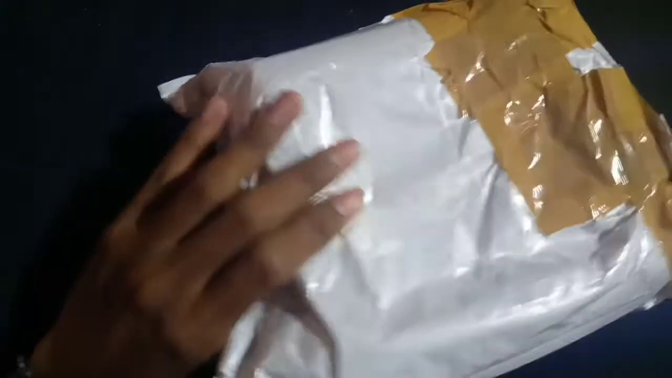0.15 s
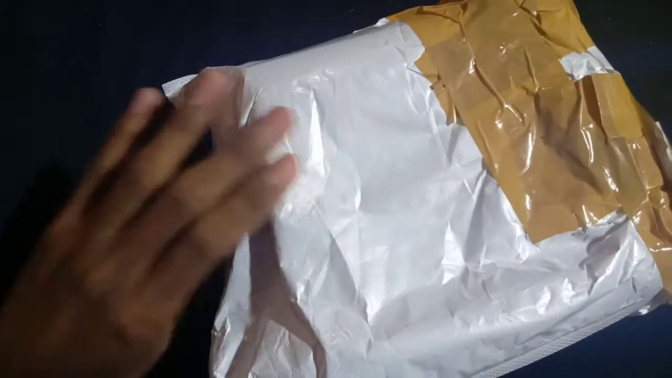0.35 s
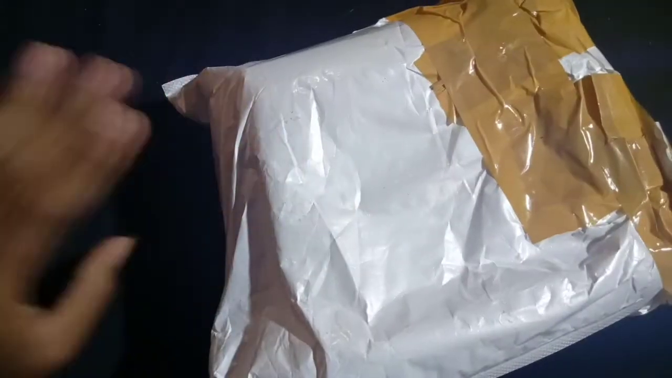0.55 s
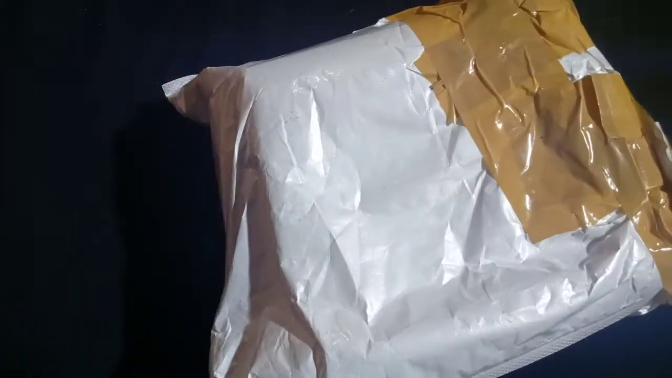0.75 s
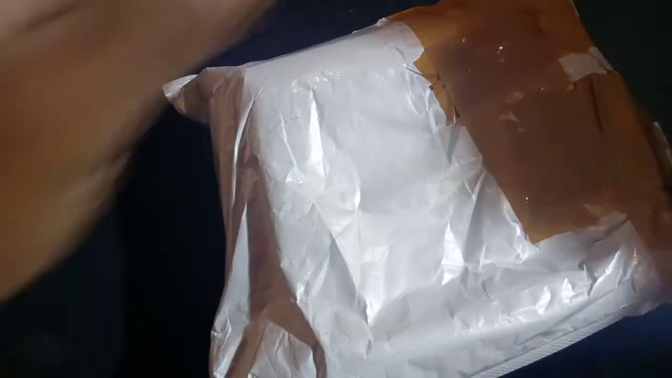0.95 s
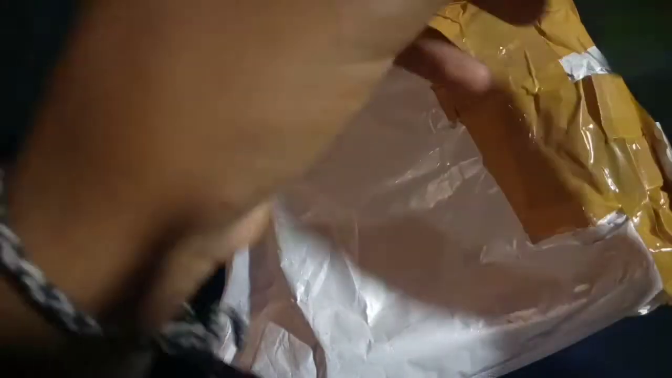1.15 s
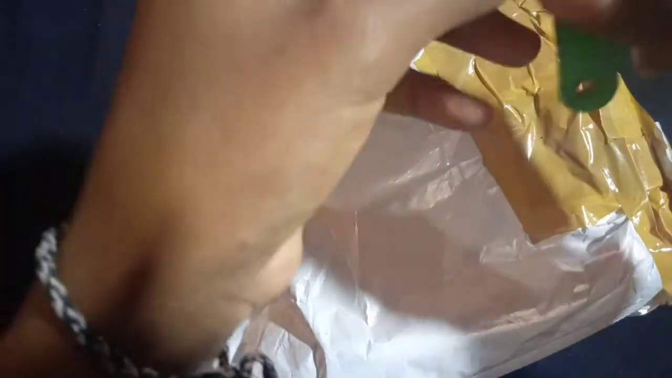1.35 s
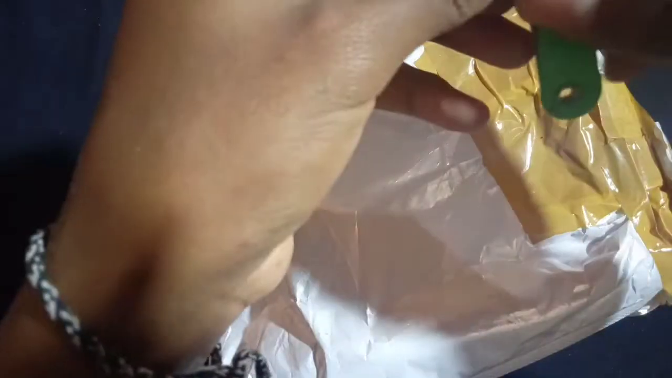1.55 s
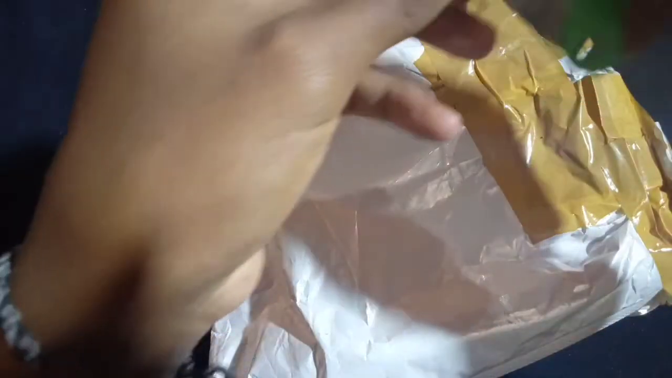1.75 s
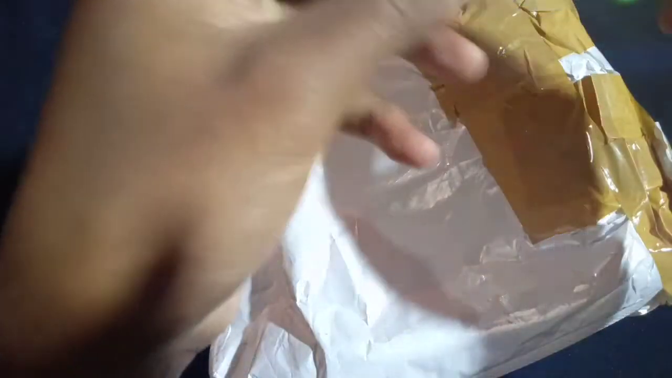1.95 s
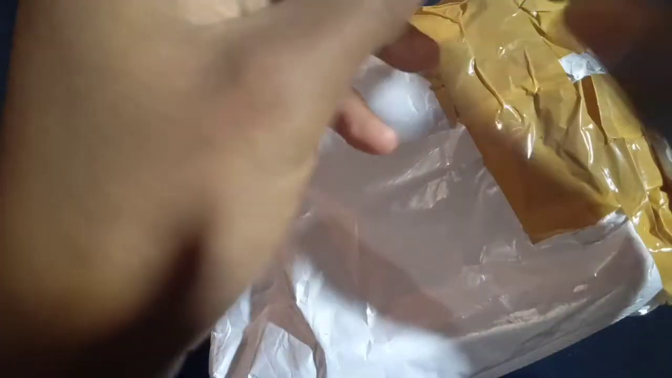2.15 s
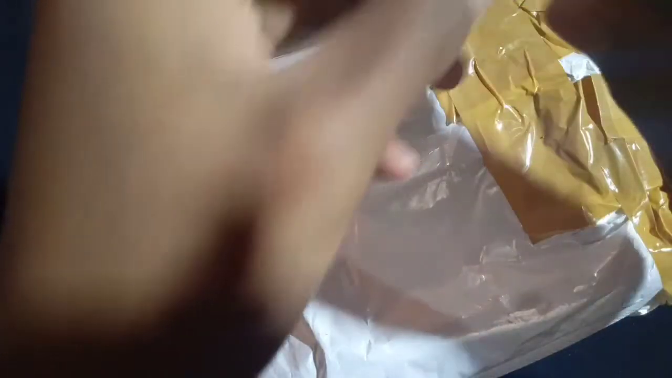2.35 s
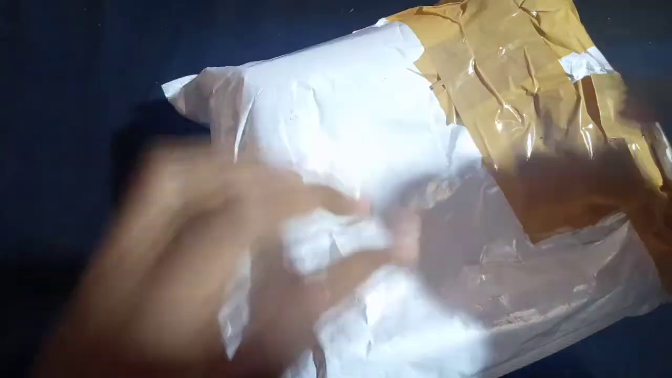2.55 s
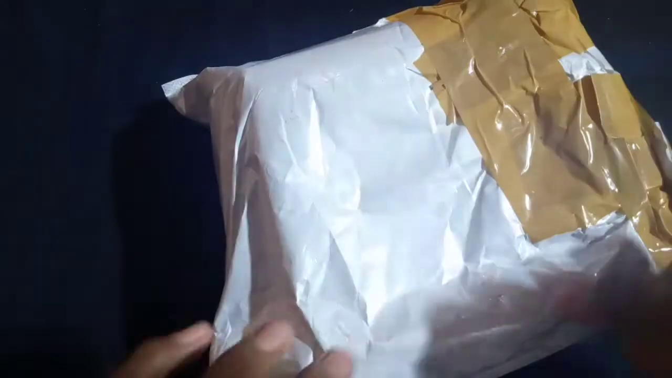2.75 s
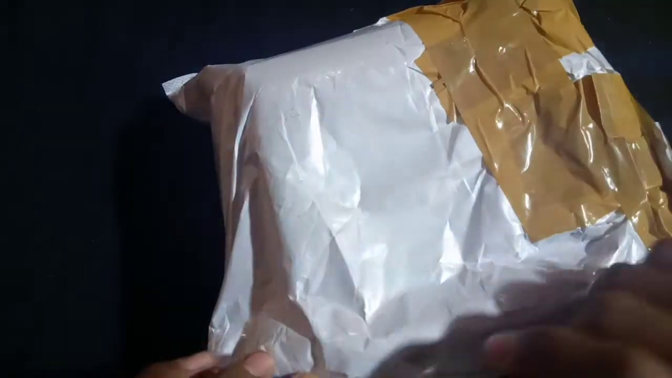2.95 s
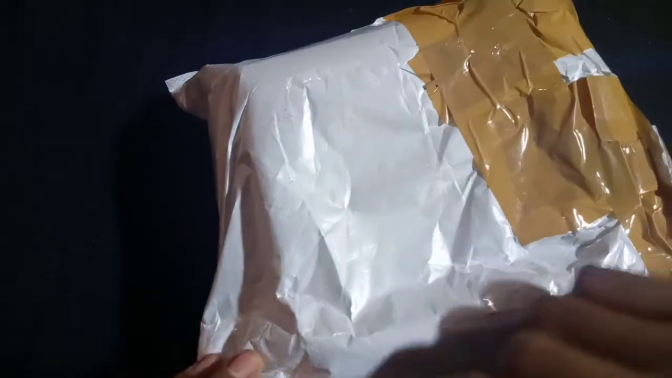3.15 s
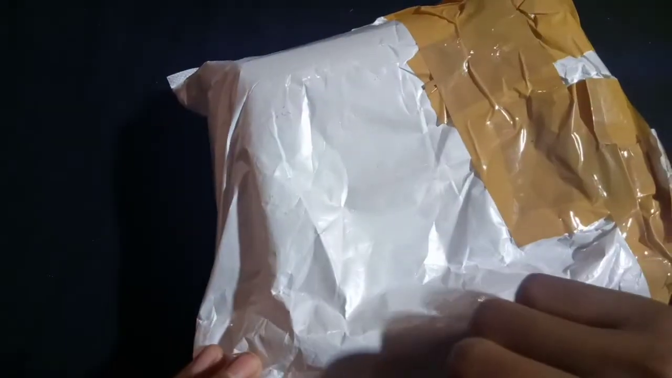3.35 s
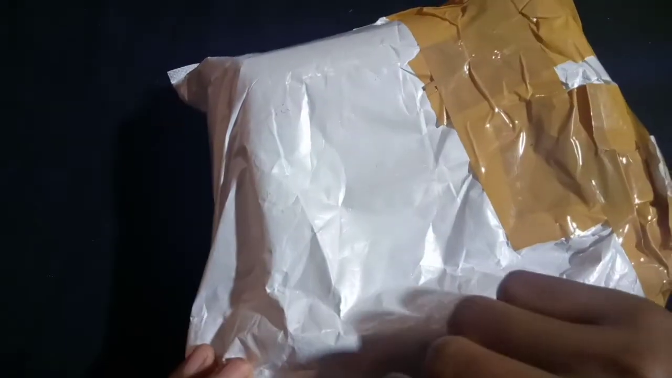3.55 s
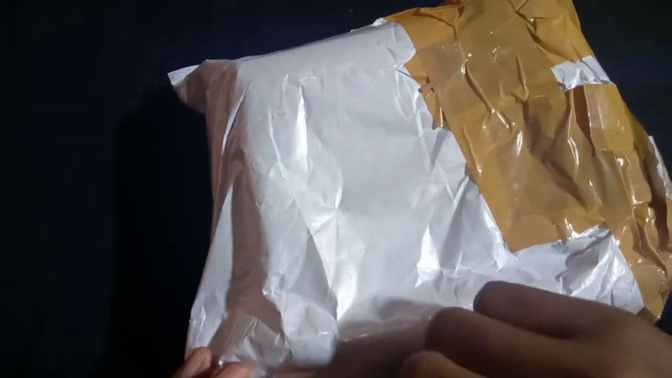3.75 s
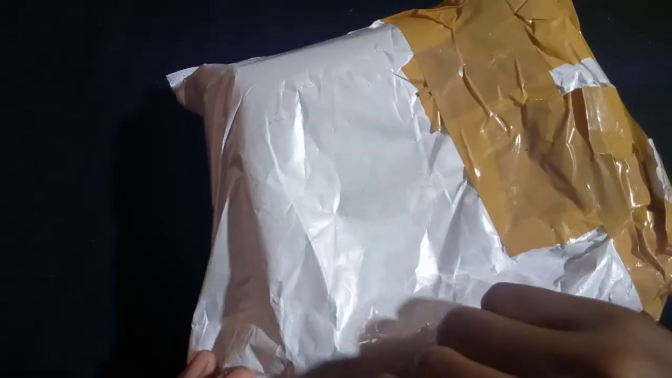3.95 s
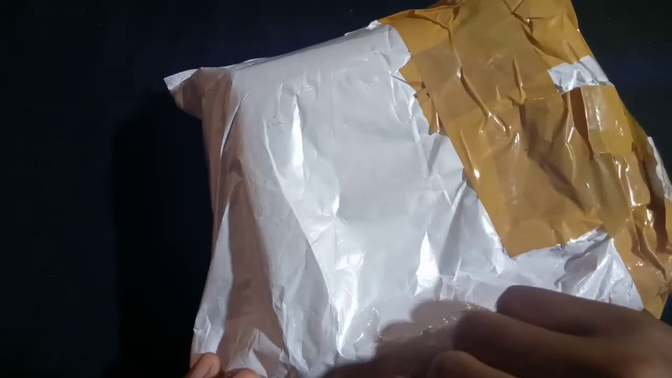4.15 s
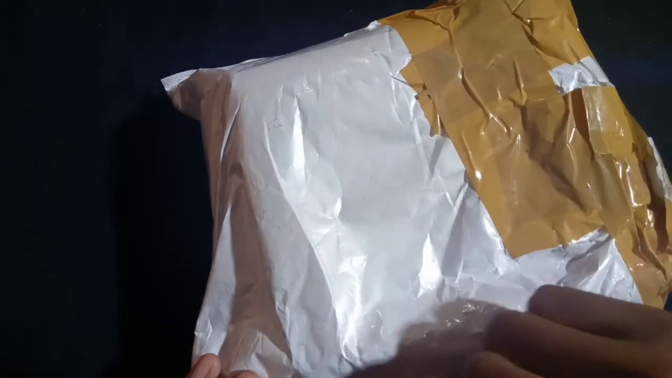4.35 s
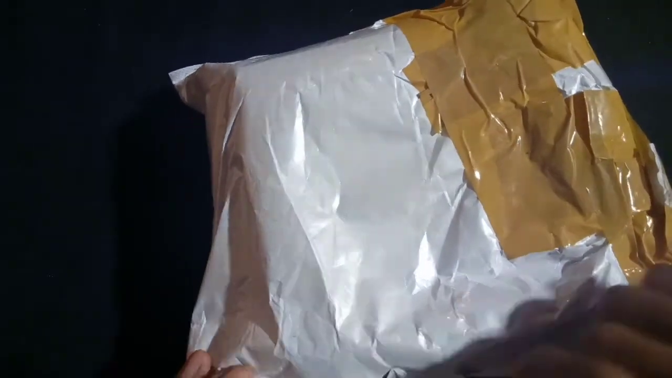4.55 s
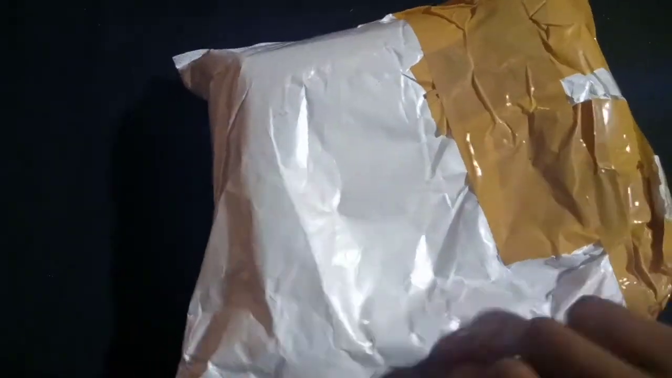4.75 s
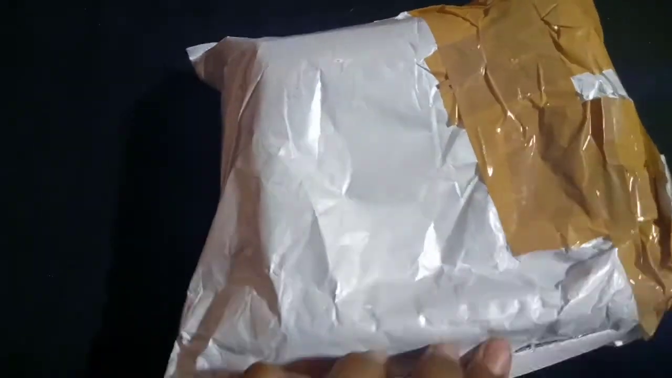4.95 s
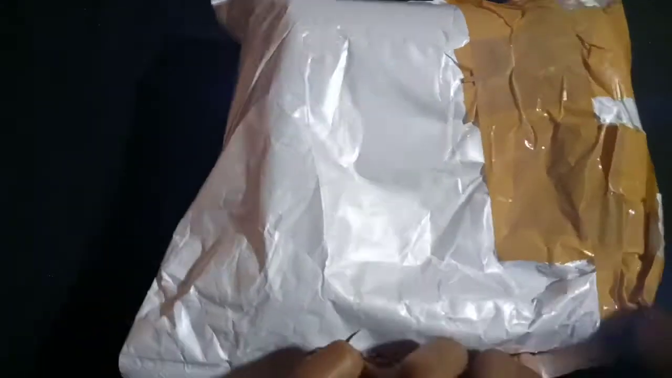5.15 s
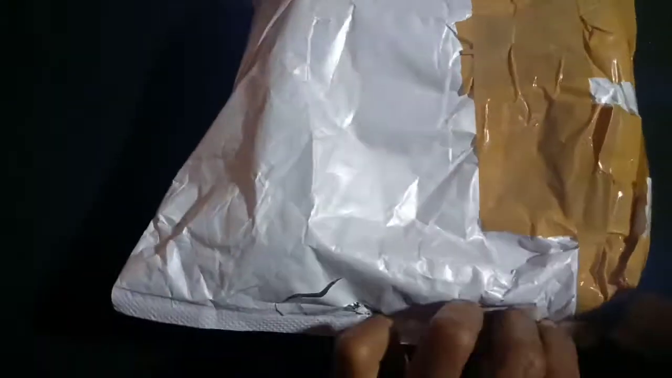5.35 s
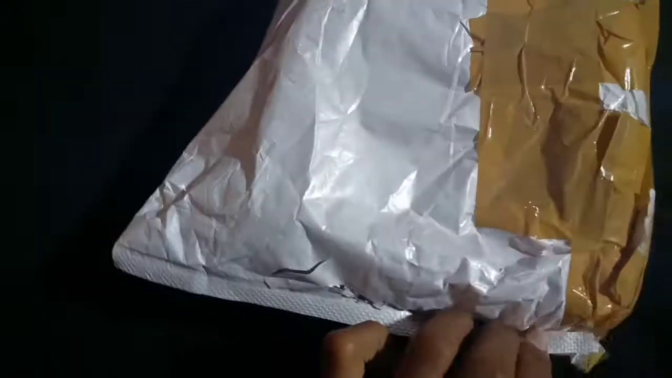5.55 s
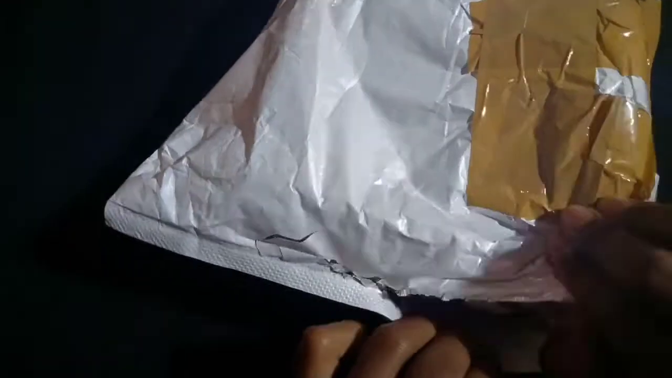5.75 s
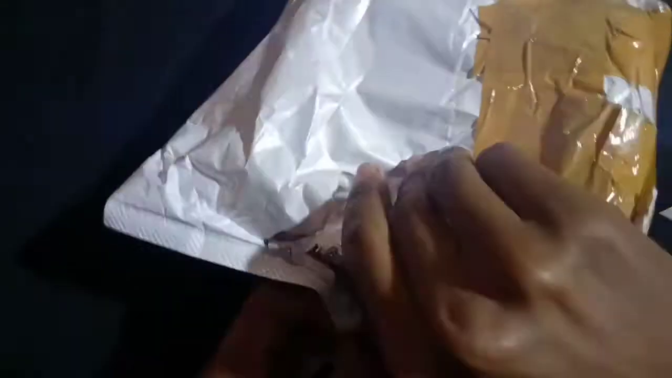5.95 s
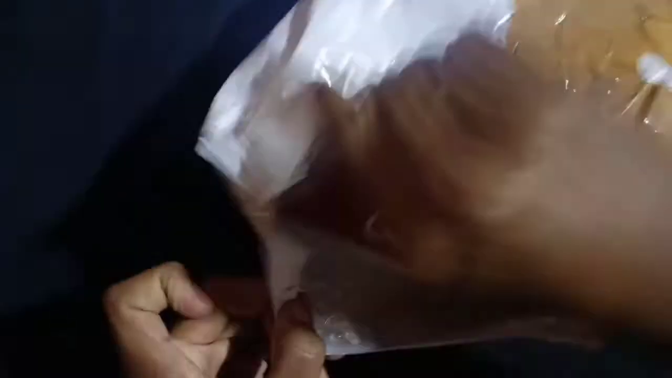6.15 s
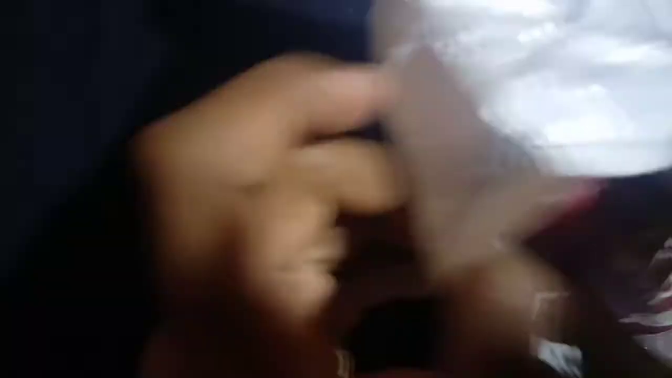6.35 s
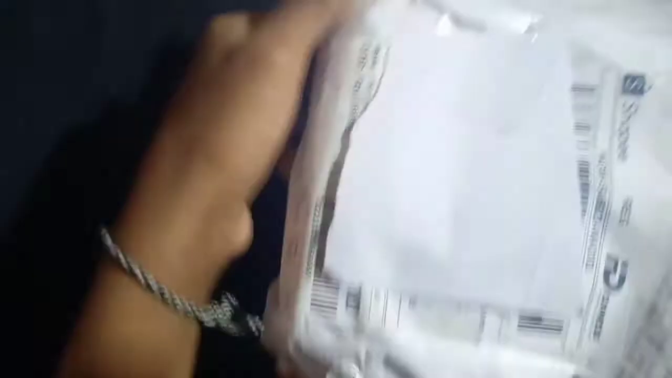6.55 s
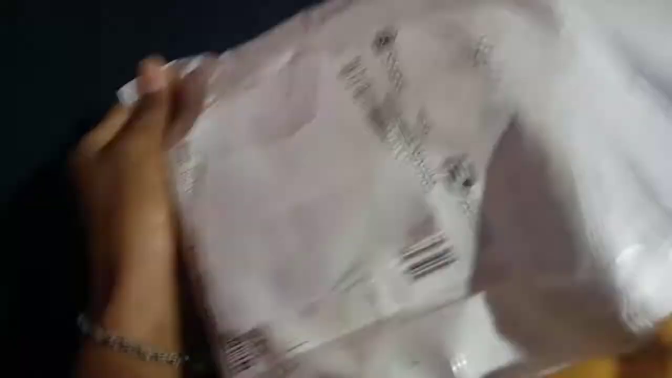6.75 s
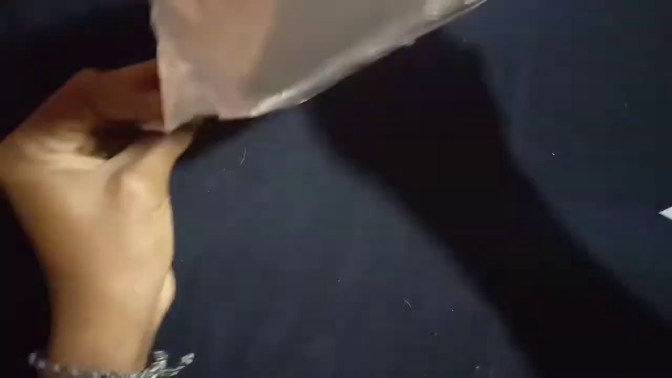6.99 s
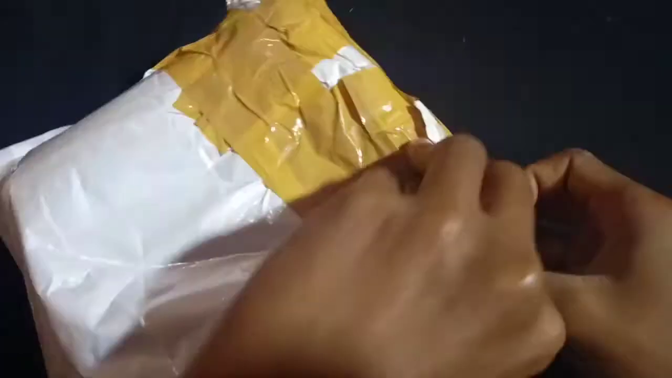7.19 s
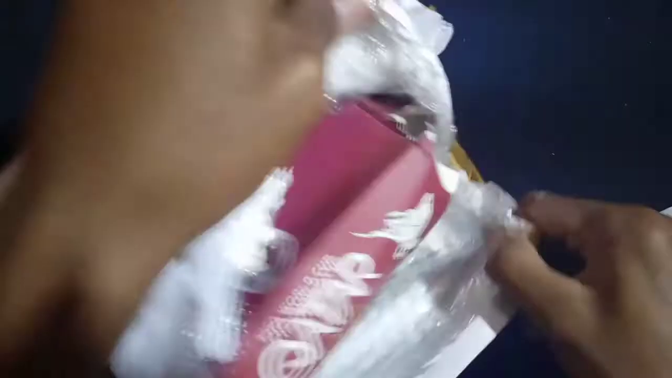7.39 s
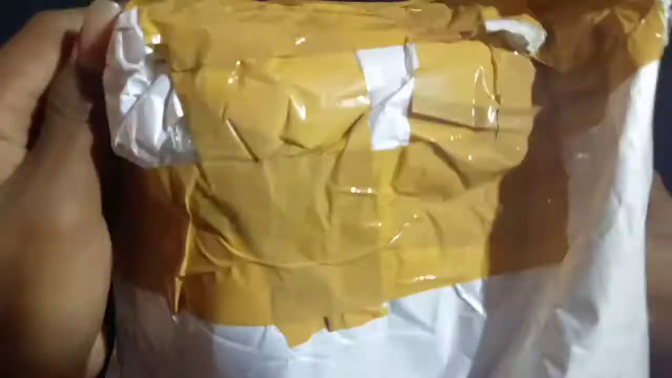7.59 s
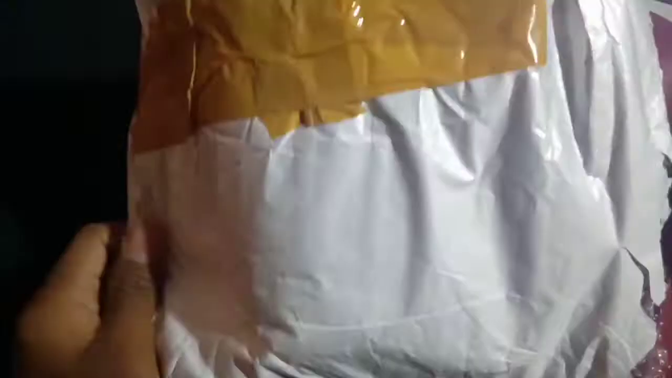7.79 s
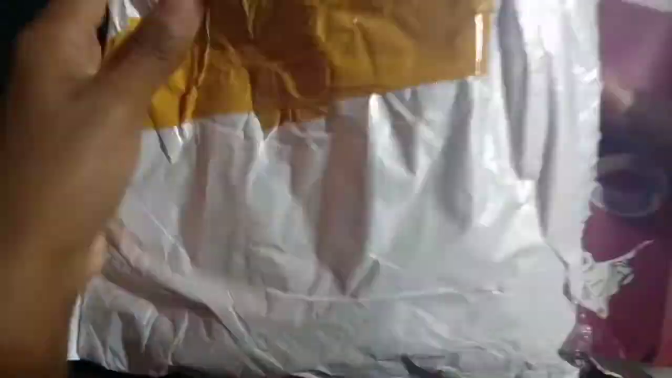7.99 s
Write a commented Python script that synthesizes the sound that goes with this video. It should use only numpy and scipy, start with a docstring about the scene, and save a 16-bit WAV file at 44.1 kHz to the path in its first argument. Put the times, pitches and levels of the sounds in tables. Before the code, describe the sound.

A taped plastic mailer is pressed on a table with hollow knocks and crisp creases, pauses, then is ripped open in bright, dry, dense crackling.

```python
"""A taped plastic mailer is pressed and gripped on a table; a second scene then plays at once, in which it is held up
and ripped open by hand, close to a phone. Its film sounds as single creases, made of short noise pushes that ring a
fold, over a dense crinkle of tiny clicks and sliding hiss. On the table the parcel adds hollow knocks, made of decaying
sines, and a small room answers; held up and torn, the loose film sounds thin, bright and dry. Shaped noise gives
a bump and a scuff, room hiss behind the first scene and a faint rumble behind the second."""
import sys
import numpy as np
from scipy import signal
from scipy.fft import rfft, irfft
from scipy.io import wavfile
from scipy.ndimage import uniform_filter1d

SR = 44100
rng = np.random.default_rng(int(sys.argv[2]) if len(sys.argv) > 2 else 0)


def store_wav(level_fs):
    """Save 16-bit WAV to argv[1]."""
    pcm = np.round(np.clip(np.atleast_2d(level_fs), -1, 1) * 32767)
    wavfile.write(sys.argv[1], SR, pcm.T.astype(np.int16))


N = 353682
TIME = np.arange(N) / SR
GRIP_S, SECOND_SCENE_S = 2.7, 4.51  # the stroking hand starts to grip; the second scene starts (seconds)


def undb(db):
    """Turn decibels into gain."""
    return 10 ** (np.asarray(db) / 20)


def unit(x):
    """Scale to an rms level of 1."""
    return x / np.sqrt(np.mean(x ** 2) + 1e-18)


def add(out, s, x):
    """Mix x into out from time s, in seconds."""
    i = max(int(s * SR), 0)
    out[i:i + len(x)] += x[:max(N - i, 0)]


def band(x, edges_hz, order=3):
    """Keep the frequencies between two edges."""
    sos = signal.butter(order, np.clip(edges_hz, 10, .48 * SR), "band", fs=SR, output="sos")
    return signal.sosfilt(sos, x)


def ring(x, hz, q):
    """One resonance with gain 1 at its centre; a higher q rings longer."""
    centre_hz = min(hz, .4 * SR)
    b, a = signal.iirpeak(centre_hz, max(q, hz / (.4 * SR), .5), fs=SR)
    return signal.lfilter(b, a, x)


def response(points, size=1024):
    """Impulse response with the given (Hz, dB) colour and its energy as early as possible."""
    hz, db = np.transpose(points)
    bins_hz = np.fft.rfftfreq(size, 1 / SR)
    log_gain = np.log(undb(np.interp(np.log(bins_hz + 1), np.log(hz), db)))
    # folding the cepstrum forward in time gives the minimum-phase response
    cepstrum = irfft(log_gain)
    cepstrum[1:size // 2] *= 2
    cepstrum[size // 2 + 1:] = 0
    return irfft(np.exp(rfft(cepstrum)))


def through(x, impulse):
    """Convolve, keeping the length."""
    return signal.oaconvolve(x, impulse)[:len(x)]


def walk(rate):
    """Random wander through about `rate` new values per second, joined by straight lines."""
    count = max(int(N / SR * rate), 2)
    return 0.94 * np.interp(np.arange(N), np.linspace(0, N, count), rng.standard_normal(count))


def level_curve(points):
    """Gain over time from (seconds, dB) points, practically silent outside them."""
    return undb(np.interp(TIME, *np.transpose(points), left=-120, right=-120))


def background():
    """Steady noise: even room hiss behind the first scene, a faint low rumble behind the second."""
    # Colour of the still room. Each row: frequency in Hz, level in dB.
    hiss_colour = [(15, -45), (25, -13), (97, -6), (249, -4.5), (463, -11.5), (531, -11.5), (818, -15.5),
                   (1100, -15), (1290, -17), (2840, -19.5), (4870, -27), (14000, -26), (16000, -30)]
    # Colour of the rumble. Each row: frequency in Hz, level in dB.
    rumble_colour = [(15, 5), (30, -4), (60, -11.5), (120, -17.5), (300, -17.5), (1000, -33)]
    hiss = unit(through(rng.standard_normal(N), response(hiss_colour, size=8192))) * undb(-56.5)
    rumble = unit(through(rng.standard_normal(N), response(rumble_colour, size=8192))) * undb(-60)
    return np.where(TIME < SECOND_SCENE_S, hiss, rumble)


def effort(starts, lengths, levels_db, attack_s, release_s, rest_db):
    """Gain of the rustle: each move of the hand sets in, holds and dies away, over the faint stir of held film."""
    power = np.full(N, undb(rest_db) ** 2)
    for s, length_s, db in zip(starts, lengths, levels_db):
        t = np.arange(int((length_s + 10 * release_s) * SR)) / SR
        rise = np.minimum(t / attack_s, 1)
        fall = np.exp(-np.maximum(t - length_s, 0) / release_s)
        add(power, s, (undb(db) * rise * fall) ** 2)
    return np.sqrt(power)


def film_voices(colour):
    """Split the film's colour into three impulse responses: broad panels, folds and sharp crack."""
    # Ranges of the panels, the folds and the crack. Each row: low edge in Hz, high edge in Hz.
    voice_edges = [(130, 1600), (1600, 6000), (6000, 17000)]
    return [band(response(colour), edges) for edges in voice_edges]


def crinkle(levels, colour, rate, scatter_db, slip_rate, slip_s, slip_db, slide_db,
            facet_q, facet_db, shift_db, flicker_db, count=16):
    """Tiny creases pop on facets of many sizes, over the hiss of film sliding on film.

    levels holds the gains of panel, fold and crack; the rates count pops and slips per second.
    """
    pops = np.zeros(N)
    for facet_hz in np.geomspace(700, 14000, count):
        at = np.flatnonzero(rng.random(N) < rate / count / SR)
        chance = rng.standard_normal(N)[at]
        clicks = np.zeros(N)
        clicks[at] = np.sign(chance) * undb(scatter_db * np.minimum(chance ** 2, 4))
        # the strain wanders from facet to facet, so the colour keeps shifting
        facet_gain = undb(facet_db + shift_db * walk(25))
        pops += clicks + facet_gain * ring(clicks, facet_hz, facet_q)
    # every slip of the fingers sets off a flurry that starts at once and dies away
    slip_starts = 1. * (rng.random(N) < slip_rate / SR)
    flurries = signal.lfilter([1], [1, -np.exp(-1 / (slip_s * SR))], slip_starts)
    slide = undb(slide_db) * rng.standard_normal(N)
    push = (unit(pops) + slide) * np.sqrt(1 + undb(slip_db) ** 2 * flurries)
    # the flurries share out the effort of the hand, which wavers a little
    local_power = uniform_filter1d(push ** 2, size=3000)
    push = push / np.sqrt(local_power + 1e-9) * undb(flicker_db * walk(40))
    return sum(unit(through(push, voice)) * gain for voice, gain in zip(film_voices(colour), levels))


def table_rumble(panel, gain_db, edges_hz):
    """The table top carries the low part of the pressing: low noise that follows the panels' gain."""
    return unit(band(rng.standard_normal(N), edges_hz)) * undb(gain_db) * panel


def pressed_creases(panel_db, panel_db_per_octave, typical_hz):
    """List the pressed creases as rows for snaps(); a low-ringing crease moves more of the panels around it."""
    # Creases snapping on the table. Each row: time in seconds, fold level in dB, fold ring in Hz,
    # crack level in dB relative to the fold.
    creases = [(0.0632, -25, 2900, -4), (0.0907, -17.5, 1940, -18), (0.1039, -27.5, 5300, 0),
               (0.123, -33, 3810, 1), (0.1815, -30.5, 2430, 4), (0.2034, -22, 2120, -25),
               (0.2416, -27, 2210, -24), (0.253, -23, 2580, -30), (1.2586, -54, 3770, -6),
               (1.468, -52.5, 2880, -12), (1.6273, -55, 3380, -4), (1.692, -69, 3270, 22),
               (1.8556, -56, 3870, -5), (2.0322, -58.5, 5730, 16.5), (2.1545, -58.5, 3500, 9),
               (2.2664, -51.5, 5680, 9), (2.286, -46.5, 5740, 10.5), (2.8603, -34, 3510, -12),
               (2.876, -29.5, 3730, -6), (2.9218, -30.5, 4280, -4), (2.9628, -32, 2530, -10),
               (2.9742, -30, 4700, -4), (3.0412, -30.5, 3840, -5), (3.0976, -19, 3840, -14),
               (3.154, -41, 5170, 9), (3.1742, -30.5, 4900, -4), (3.3777, -32.5, 5600, -0.5),
               (3.448, -33.5, 5700, 8), (3.3968, -47, 5160, 10), (3.475, -35, 4600, 0),
               (3.5149, -42, 4540, 8.5), (3.6404, -39, 1940, -11), (3.6538, -36.5, 4600, 7),
               (3.6797, -35.5, 3830, 2.5), (3.7469, -32.5, 2600, -1), (3.7742, -25, 3600, -4),
               (3.7975, -18.5, 2220, -7.5), (3.8357, -30, 2730, -11), (3.8589, -23, 4270, 0),
               (3.8769, -17.5, 4570, -1.5), (3.9162, -31.5, 4480, 3), (3.9363, -22, 3360, 9.5),
               (4.1698, -46, 4670, 9), (4.2032, -36.5, 4500, 0.5), (4.345, -22.5, 2940, 9.5),
               (4.3622, -28.5, 3420, -5), (4.377, -29.5, 4120, -7), (4.3987, -38, 4280, 12),
               (4.4529, -44, 4400, 18), (4.4934, -34.5, 4320, 3)]
    rows = []
    for s, db, hz, crack_db in creases:
        rows.append((s, db, hz, panel_db - panel_db_per_octave * np.log2(hz / typical_hz), crack_db))
    return rows


def small_snaps(gain, start_s, end_s, over_db, scatter_db, fold_hz, octaves, panel_db, crack_db, count):
    """List lesser creases at random times as rows for snaps(), with levels that follow the rustle's gain."""
    when, size, tune, broad, sharp = rng.uniform(-1, 1, size=(count, 5)).T
    s = start_s + (when + 1) / 2 * (end_s - start_s)
    # one crease sets off its neighbour a moment later, typically 14 ms
    s[1::2] = s[::2] + .014 * (1 + when[1::2] / 2)
    db = 20 * np.log10(np.interp(s, TIME, gain) + 1e-9) + over_db + scatter_db * size
    hz = fold_hz * 2 ** (octaves * tune)
    return list(zip(s, db, hz, panel_db + scatter_db * broad, crack_db + scatter_db * sharp))


def dulled(colour, top_db):
    """A big crease is darker at the very top than the fine rustle."""
    return [(hz, db + top_db * (hz > 11500)) for hz, db in colour]


def snaps(rows, colour, buckle_s, swell, creak_s, creak_db, shiver_s, shiver_db, fold_q, spread_db, bounce):
    """A crease creaks under strain, buckles in about a millisecond, rings its fold and leaves the sheet shivering.

    Each row: time in seconds, fold level in dB, fold ring in Hz, then panel and crack in dB relative to the fold.
    """
    lead_s, measure_s = .008, .004  # room for the creak; stretch of sound that sets the level
    out, t, voices = np.zeros(N), np.arange(2048) / SR - lead_s, film_voices(colour)
    first = (t > -measure_s / 4) & (t < 3 * measure_s / 4)
    after, age = t >= 0, np.abs(t)
    typical_db = np.median(np.array(rows)[:, 1])
    for s, db, hz, panel_db, crack_db in rows:
        jolt, shiver, grain = rng.standard_normal((3, len(t)))
        path = rng.random()
        # a louder snap runs further along the crease
        run_s = buckle_s * undb(swell * (db - typical_db))
        buckle = jolt * np.exp(-age / run_s)
        shivering = undb(shiver_db) * shiver * np.abs(grain) * np.exp(-age / shiver_s)
        push = after * (buckle + shivering)
        # the far wall of the bag throws it back, by another path for each crease
        push = push - bounce * np.roll(push, int((.0003 + .0009 * path) * SR))
        creak = ~after * undb(creak_db) * shiver * np.exp(-age / creak_s)
        panel = through(push, voices[0])
        fold = through(push + creak, voices[1])
        crack = through(push, voices[2])
        fold = ring(fold, hz, fold_q) + undb(spread_db) * fold
        for part, part_db in ((panel, panel_db), (fold, 0), (crack, crack_db)):
            add(out, s - lead_s, part * undb(db + part_db) / np.sqrt(np.mean(part[first] ** 2)))
    return out


def knocks():
    """The hand knocks the filled parcel: its modes ring in a new mix, and a softer contact leaves only the low ones."""
    # Knocks of the hand. Each row: time in seconds, level in dB, contact cut-off in Hz.
    hits = [(0.09, -14.5, 2200), (.152, -22, 397), (0.178, -24.5, 1110), (.207, -25, 504),
            (0.2416, -22.5, 1300), (.2545, -21.5, 586), (0.263, -25.5, 2200), (0.278, -31, 900),
            (0.449, -66, 900), (1.535, -54, 600), (2.9619, -25, 610), (3.146, -26, 565),
            (3.798, -31.5, 1800), (4.345, -32.5, 700)]
    # Modes of the parcel before random variation. Each row: frequency in Hz, relative level in dB,
    # time to fall by 60 dB in seconds.
    parcel_modes = [(301.5, -10.5, 0.045), (387, -2.5, 0.031), (462, -11.5, 0.031), (534, 0.5, 0.037),
                    (630, 4.5, 0.0094), (880, -2.5, 0.035), (1120, -5, 0.037), (1364, -9.5, 0.051),
                    (1894, -3, 0.018)]
    out, t = np.zeros(N), np.arange(6000) / SR
    hz, db, t60 = np.transpose(parcel_modes)[:, :, None]
    measure_s = .015  # opening stretch that sets the level
    for s, level_db, contact_hz in hits:
        detune, place = rng.standard_normal((2, len(parcel_modes), 1))
        tones = np.sin(2 * np.pi * hz * (1 + 0.036 * detune) * t)
        modes = undb(db + 3.1 * place) * tones * np.exp(-np.log(1000) * t / t60)
        flip = rng.choice([-1, 1], (len(parcel_modes), 1))
        contact = signal.butter(2, contact_hz, fs=SR, output="sos")
        knock = signal.sosfilt(contact, (flip * modes).sum(axis=0))
        # so small a parcel radiates little bass
        knock = band(knock, [230, 5000], order=2)
        add(out, s, knock * undb(level_db) / np.sqrt(np.mean(knock[:int(measure_s * SR)] ** 2)))
    return out


def room(x, t60_s, low_db, high_db):
    """Diffuse answer of a small room: a noise tail that builds up over a few milliseconds, then dies away."""
    t = np.arange(SR // 2) / SR
    tail = rng.standard_normal(len(t)) * np.exp(-np.log(1000) * t / t60_s) * (1 - np.exp(-t / 0.0019))
    colour = response([(500, low_db), (3000, high_db), (12000, high_db + 0.5)])
    return through(x, through(tail / np.linalg.norm(tail), colour))


def bump():
    """A dull, brief swell of low noise as the arm moves over the table."""
    # Course of the swell. Each row: time in seconds, level in dB.
    swell_points = [(.69, -80), (.735, -50), (.755, -55), (.812, -44), (.83, -46.5), (.852, -47),
                    (.89, -62), (.96, -83)]
    return unit(band(rng.standard_normal(N), [72, 150], order=2)) * level_curve(swell_points)


def on_table():
    """First scene: knocks, snaps and crinkle of the lying parcel, answered by the room."""
    # The fingers press, slide and grip. Each row: start in seconds, length in seconds, fold level in dB,
    # then panel and crack in dB relative to the fold.
    presses = [(0, 0.0057, -37, 3.5, 0.5), (0.043, .15, -35, -1.5, -2), (0.246, 0.051, -41.5, 7.5, -3),
               (0.423, 0.088, -66.5, -1, 7.5), (0.803, 0.073, -63.5, 2, 0.5), (1.295, 0.044, -70, 2, 11),
               (1.58, 0.063, -77, -4, 17.5), (2.24, 0.094, -66, -3, 4), (2.838, 0.071, -45, 0, 4.5),
               (2.923, 0.083, -38.5, -3.5, 0.5), (3.038, 0.19, -43, -2, 2), (3.324, 0.15, -52.5, -0.5, 2.5),
               (3.438, 0.063, -48.5, -2.5, 3), (3.636, 0.097, -48.5, 0, 0), (3.753, 0.12, -38, -2.5, -2.5),
               (3.931, 0.019, -38.5, 1, 5.5), (4.113, 0.14, -50.5, 0.5, 6), (4.331, 0.033, -39, -2.5, -2),
               (4.439, 0.027, -42.5, -1, 4.5)]
    # Colour of the film under a flat, stroking hand. Each row: frequency in Hz, level in dB.
    stroked = [(60, -50), (120, -16), (280, -2.5), (500, 0.5), (760, -4), (1200, -10), (2050, -9.5),
               (2900, -8.5), (4200, -12), (6800, -14), (11500, -12.5), (16000, -27)]
    # Colour of the film lying on the table. Each row: frequency in Hz, level in dB.
    lying = [(60, -43), (120, -20), (280, -5), (500, -.5), (760, -4.5), (1200, -10), (2050, -8),
             (2900, -12), (4200, -9.5), (6800, -15), (8000, -6.5), (9100, -14.5), (10300, -7), (12000, -14),
             (16000, -23)]
    s, length, db, panel_db, crack_db = np.transpose(presses)
    panel, fold, crack = (
        effort(s, length, db + part_db, attack_s=0.014, release_s=0.048, rest_db=-74) * (TIME < SECOND_SCENE_S)
        for part_db in (panel_db, 0, crack_db))
    rows = pressed_creases(panel_db=-10.0, panel_db_per_octave=3.5, typical_hz=3770)
    rows += small_snaps(fold, 0, SECOND_SCENE_S, over_db=-3.5, scatter_db=4.5, fold_hz=4230, octaves=0.44,
                        panel_db=-9, crack_db=4.5, count=36)
    snapping = snaps(rows, dulled(lying, top_db=-5.5), buckle_s=0.00034, swell=0.038,
                     creak_s=0.00063, creak_db=-26, shiver_s=0.0023, shiver_db=-19.5,
                     fold_q=3.9, spread_db=-15, bounce=0.37)
    levels = np.array([panel, fold, crack])
    # a flat hand strokes the film before the fingers grip its edge
    stroking = crinkle(levels * (TIME < GRIP_S), stroked, rate=1400, scatter_db=3,
                       slip_rate=77, slip_s=0.0032, slip_db=5, slide_db=-5.5,
                       facet_q=9.7, facet_db=-7, shift_db=11, flicker_db=1.2)
    pressing = crinkle(levels * (TIME >= GRIP_S), lying, rate=1500, scatter_db=4,
                       slip_rate=85, slip_s=0.0024, slip_db=7.5, slide_db=-1.5,
                       facet_q=9.7, facet_db=-7, shift_db=13, flicker_db=1.15)
    direct = knocks() + snapping + stroking + pressing
    answer = room(direct, t60_s=0.27, low_db=-9.5, high_db=-11.5)
    return direct + answer + table_rumble(panel, gain_db=-9, edges_hz=[68, 180]) + bump()


def jerks(uneven, scatter_db, octaves):
    """List each rip as rows for snaps(): one snap, or a short run uneven in spacing, size and pitch."""
    # Film and tape giving way. Each row: time in seconds, number of jerks, fold level in dB,
    # fold ring in Hz, then panel and crack in dB relative to the fold.
    rips = [(4.512, 1, -33.5, 4980, -22, 6), (4.52, 1, -26, 3090, -7, -5),
            (4.5358, 1, -23, 3230, -25, -2.5), (4.7196, 1, -27.5, 3630, -15, -3),
            (4.7452, 1, -25, 3150, -15, -1), (4.7663, 1, -25, 3230, -16, -5), (4.7803, 1, -26, 4190, -6, 2),
            (4.81, 2, -21.5, 3550, -12, -4), (4.8324, 2, -24.5, 3700, -12, -5),
            (5.0791, 1, -27.5, 4030, -14, -9), (5.1118, 1, -22, 4200, -14.5, -3),
            (5.1297, 1, -18.5, 4370, -10.5, 0), (5.1358, 1, -26, 4490, -7, 1),
            (5.237, 2, -30, 4000, -13, -7), (5.2871, 1, -30.5, 4300, -18, -8),
            (5.3167, 1, -28.5, 3630, -9, -7), (5.4477, 1, -17, 3900, -20.5, -2),
            (5.4515, 2, -12, 3970, -18.5, -9), (5.6232, 1, -30.5, 4100, -21, -2),
            (5.6648, 1, -25.5, 3830, -31, -10), (5.7123, 1, -22, 3800, -36, -3.5),
            (5.9257, 1, -18, 4000, -16, -5.5), (5.957, 1, -19, 3080, -13.5, -6.5),
            (6.1317, 2, -23.5, 3430, -12, -1), (6.1394, 2, -13, 3000, -22.5, -11),
            (6.1611, 2, -22, 3530, -15, -2), (6.225, 1, -24, 4400, -17, -11),
            (6.4653, 2, -25.5, 4180, -14, -0.5), (6.504, 1, -26.5, 3920, -8.5, -3),
            (6.527, 3, -18.5, 3720, -12, -4.5), (6.5699, 1, -14.5, 3600, -8, -8.5),
            (6.5857, 1, -21, 3280, -10, -7), (6.6221, 1, -22, 4000, -24, -1),
            (6.661, 1, -12, 3820, -20, -7.5), (6.9808, 2, -27.5, 3520, -23, -4),
            (7.2688, 3, -19, 4160, -20, -3), (7.3057, 2, -19, 4200, -24, 1),
            (7.3454, 1, -25.5, 3400, -9, -0.5), (7.3626, 1, -25, 3860, -8.5, 5.5),
            (7.4586, 1, -33.5, 3650, -5, -4), (7.674, 1, -19, 3820, -14, 2.5),
            (7.782, 1, -29, 4000, -12, 0), (7.6871, 2, -15, 4030, -12, -3),
            (7.7371, 1, -25.5, 4050, -3.5, -3.5), (7.822, 1, -25.5, 3070, -24, -8),
            (7.8325, 1, -22, 4020, -5.5, -4.5), (7.8894, 1, -26, 3930, -11, -8)]
    jerk_s = 0.0046  # typical time between the jerks of a rip
    rows = []
    for s, count, db, hz, panel_db, crack_db in rips:
        # a single jerk stays exactly as listed
        late, size, tune = rng.uniform(-1, 1, size=(3, 4)) * (round(count) > 1)
        for k in range(int(round(count))):
            jerk_at = s + jerk_s * (k + uneven * late[k] * (k > 0))
            jerk_hz = hz * 2 ** (octaves * tune[k])
            rows.append((jerk_at, db + scatter_db * size[k], jerk_hz, panel_db, crack_db))
    return rows


def scuff(slip_rate, edges_hz):
    """The parcel scuffs briefly as it is turned over: quick uneven slips sound its middle range."""
    # Course of the scuff. Each row: time in seconds, level in dB.
    scuff_points = [(6.735, -65), (6.757, -39), (6.783, -40), (6.797, -46), (6.83, -74)]
    slips = (rng.random(N) < slip_rate / SR) * rng.standard_normal(N)
    return unit(band(slips, edges_hz)) * level_curve(scuff_points)


def in_the_air():
    """Second scene: the film of the held-up bag stretches and rips, close and dry."""
    # The hands pull at the film. Each row: start in seconds, length in seconds, fold level in dB.
    pulls = [(4.512, 0.051, -39), (4.597, 0.041, -42), (4.675, 0.11, -40.5), (4.812, 0.048, -34),
             (4.897, 0.013, -33), (4.938, 0.023, -42), (4.99, 0.0094, -46), (5.012, 0.013, -39),
             (5.073, 0.043, -36.5), (5.174, 0.031, -40.5), (5.214, 0.038, -39.5), (5.26, 0.064, -44.5),
             (5.351, 0.1, -41.5), (5.463, 0.052, -48.5), (5.609, 0.06, -39), (5.662, 0.059, -35),
             (5.736, 0.052, -35), (5.835, 0.23, -36), (6.092, 0.13, -36.5), (6.226, 0.077, -41),
             (6.294, .12, -35.5), (6.479, .19, -33), (6.677, 0.13, -38.5), (6.805, 0.14, -41.5),
             (6.969, 0.024, -38), (7.001, .015, -36), (7.029, 0.061, -37), (7.141, 0.15, -36),
             (7.327, 0.079, -35.5), (7.428, 0.088, -37), (7.527, 0.076, -36.5), (7.576, 0.13, -34.5),
             (7.758, 0.082, -31.5), (7.846, 0.041, -34.5), (7.904, 0.083, -32), (7.947, 0.082, -30)]
    # The film goes slack between pulls. Each row: start in seconds, length in seconds.
    slack_spells = [(5.522, 0.05), (7.102, 0.019)]
    # Crack of the stretching film. Each row: time in seconds, level in dB relative to the folds.
    taut_crack = [(4.55, -5.5), (5.2, -4.5), (5.7, -4), (6.1, -3.5), (6.5, -2), (7.4, -2), (8, -1.5)]
    # Colour of the film in the air. Each row: frequency in Hz, level in dB.
    held_up = [(120, -72), (220, -42.5), (350, -30), (470, -24), (620, -17), (860, -14.5), (1100, -13.5),
               (1600, -15.5), (2150, -4.5), (3250, -1.5), (4350, -3), (7100, -7.5), (11300, -7),
               (16000, -6)]
    slack = sum(1. * ((TIME > s) & (TIME < s + length)) for s, length in slack_spells)
    slack = uniform_filter1d(slack, size=400)
    fold = effort(*np.transpose(pulls), attack_s=0.011, release_s=.012, rest_db=-52)
    fold = fold * undb(-13.5 * slack) * (TIME >= SECOND_SCENE_S)
    # panels lie 11 dB below the folds at a typical pull; a harder pull goes mostly into the folds
    typical_pull_db = -35
    panel = undb(typical_pull_db - 11) * (fold / undb(typical_pull_db)) ** 0.6
    crack = fold * undb(np.interp(TIME, *np.transpose(taut_crack)))
    rows = jerks(uneven=.15, scatter_db=3.5, octaves=0.37)
    rows += small_snaps(fold, SECOND_SCENE_S, N / SR, over_db=4.5, scatter_db=1.5, fold_hz=3700, octaves=0.38,
                        panel_db=-11.5, crack_db=-9, count=48)
    ripping = snaps(rows, held_up, buckle_s=0.00072, swell=0.3,
                    creak_s=0.00068, creak_db=-18, shiver_s=0.0056, shiver_db=-13.5,
                    fold_q=2.4, spread_db=-18, bounce=0.3)
    stretching = crinkle((panel, fold, crack), held_up, rate=1700, scatter_db=1.0,
                         slip_rate=85, slip_s=0.0052, slip_db=7, slide_db=-7,
                         facet_q=13, facet_db=7.5, shift_db=3.5, flicker_db=1.9)
    return ripping + stretching + scuff(slip_rate=440, edges_hz=[450, 1150])


def scene():
    """Pressing on the table, then the second scene of tearing in the air, over the background."""
    return (on_table() + in_the_air() + background())[None]


def record(dry):
    """Shift the second scene slightly off zero, limit the sharpest snaps at full scale and cut the top."""
    shifted = dry - 0.0025 * np.clip((TIME - SECOND_SCENE_S) / 0.014, 0, 1)
    top_cut = signal.ellip(10, .2, 70, 15700, fs=SR, output="sos")  # low-pass at 15700 Hz
    return signal.sosfilt(top_cut, np.clip(shifted, -1, 1))


dry = scene()
out = record(dry)
store_wav(out)
```